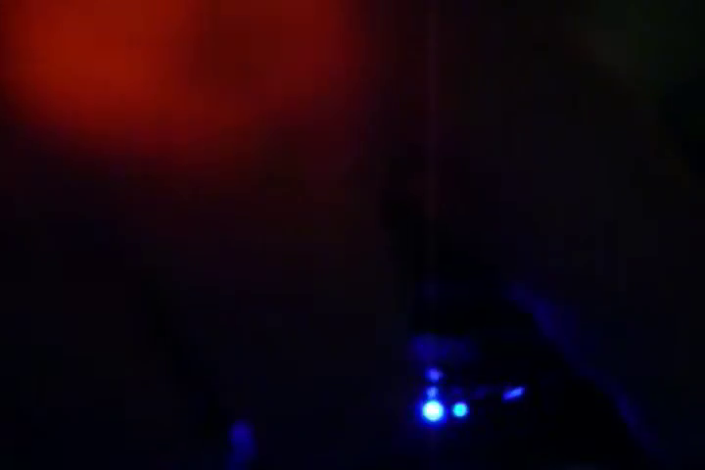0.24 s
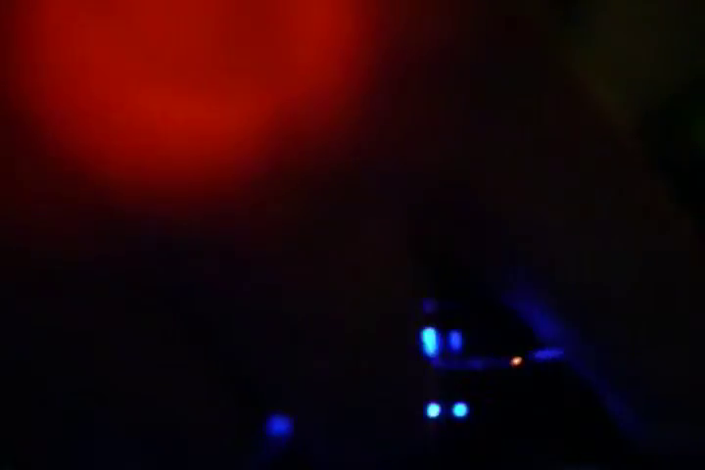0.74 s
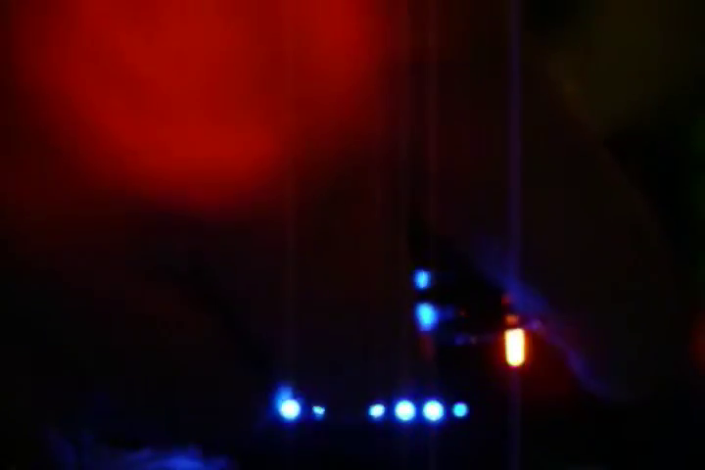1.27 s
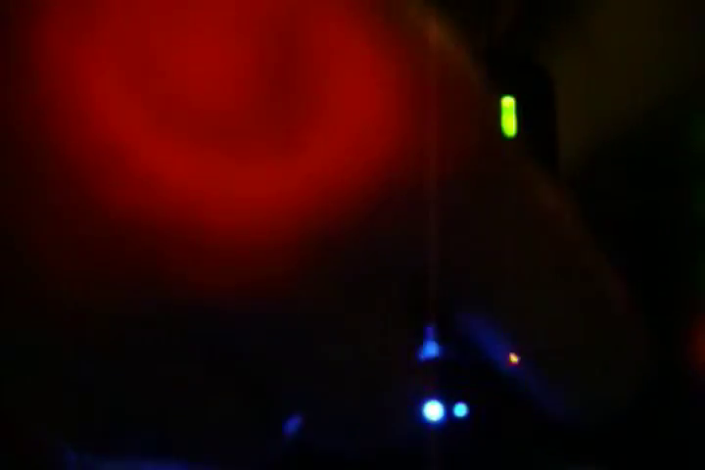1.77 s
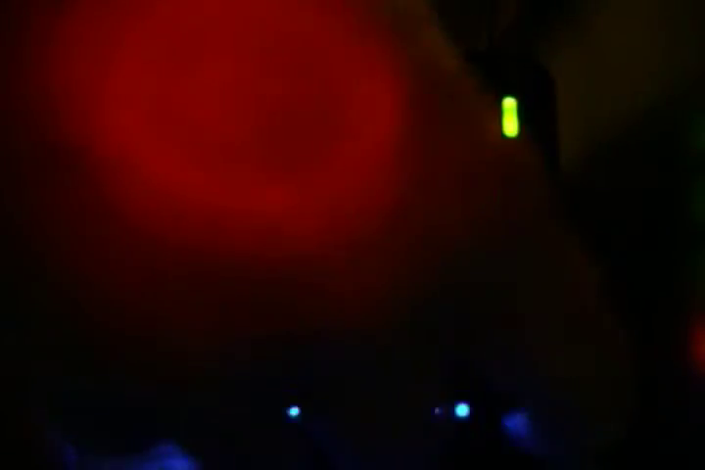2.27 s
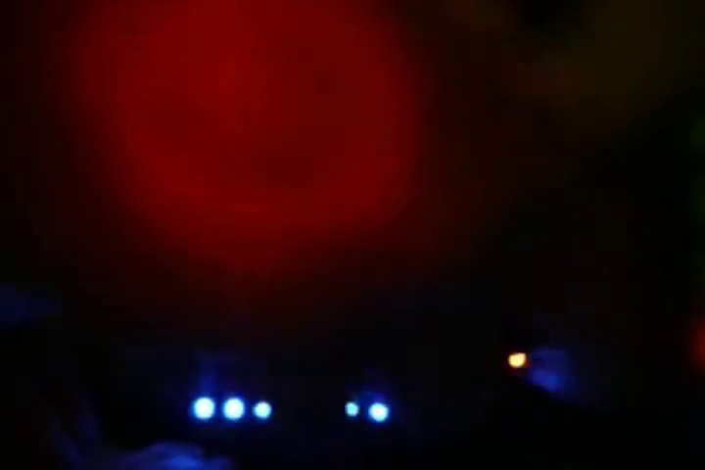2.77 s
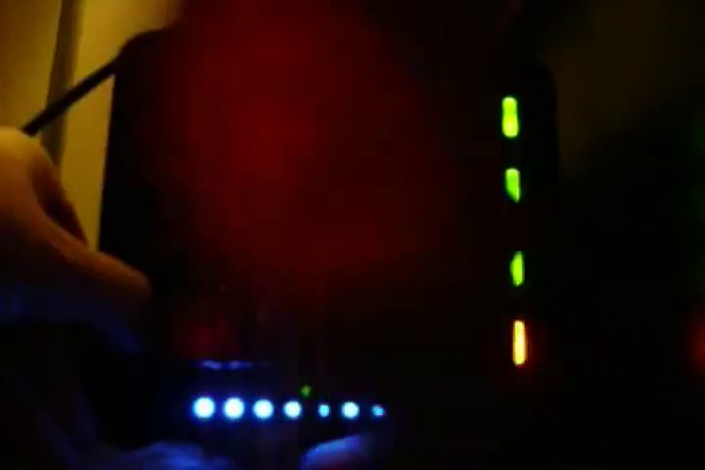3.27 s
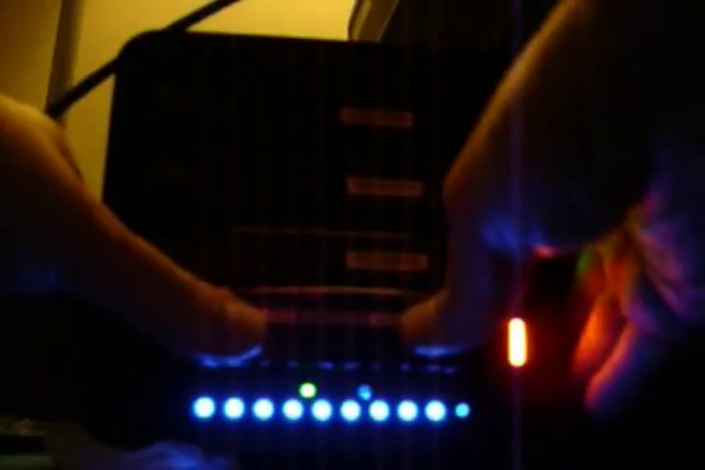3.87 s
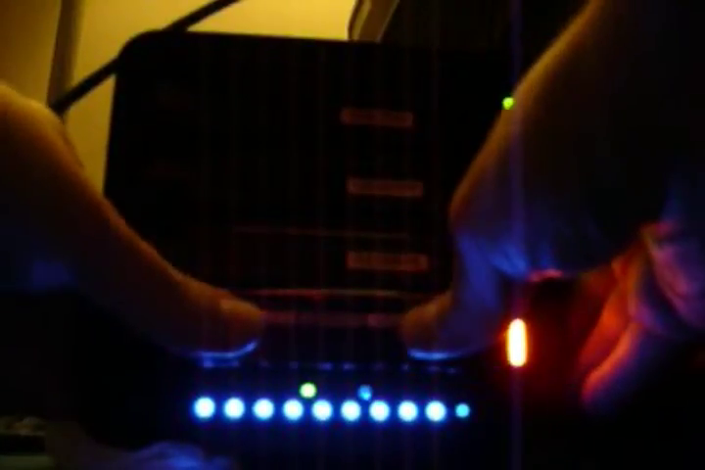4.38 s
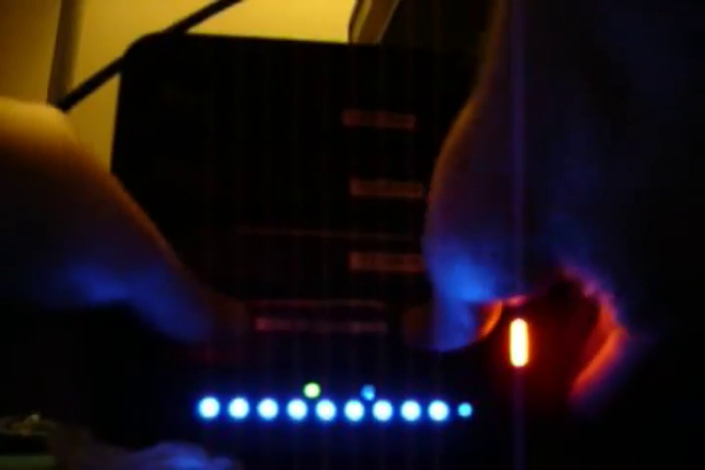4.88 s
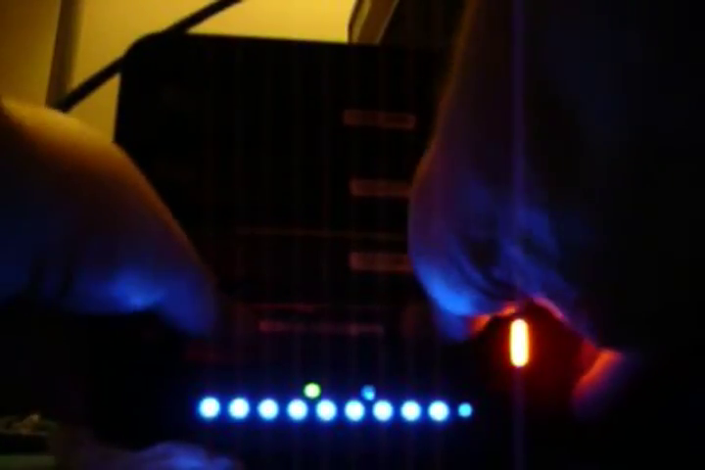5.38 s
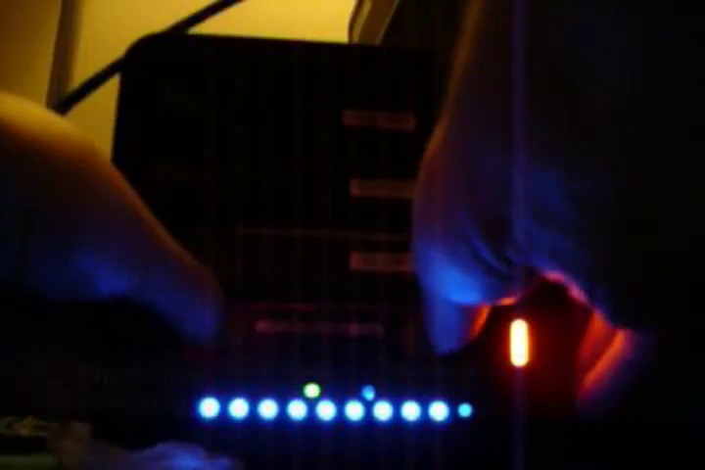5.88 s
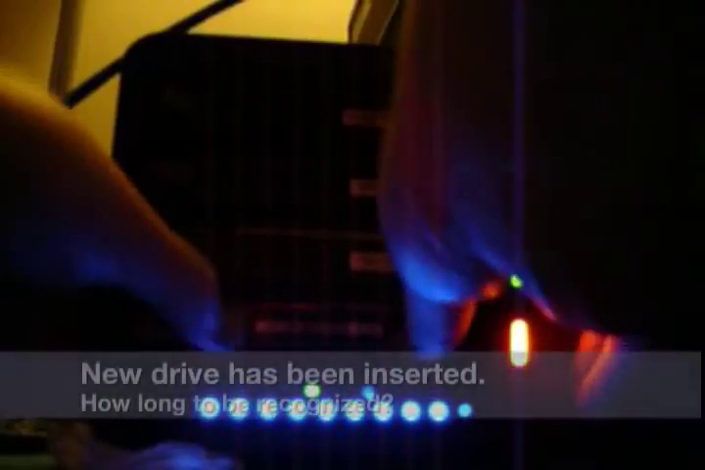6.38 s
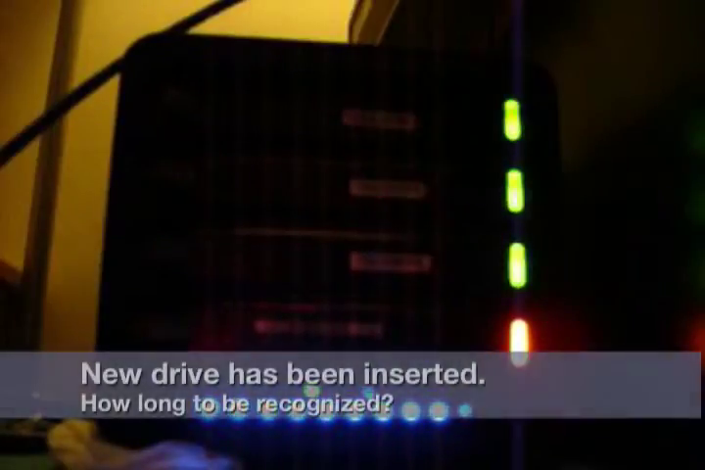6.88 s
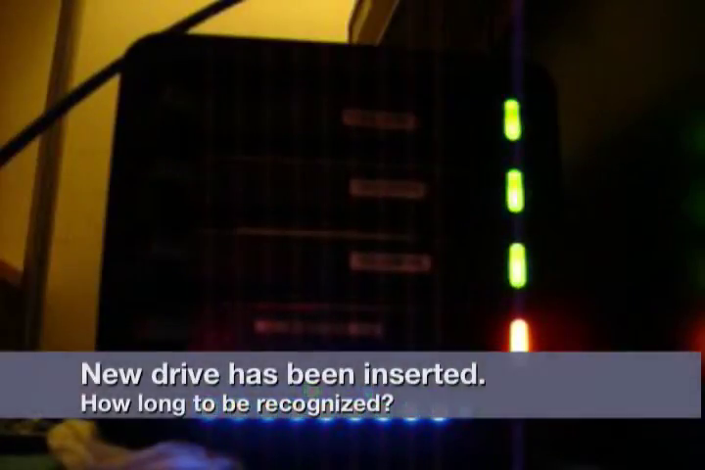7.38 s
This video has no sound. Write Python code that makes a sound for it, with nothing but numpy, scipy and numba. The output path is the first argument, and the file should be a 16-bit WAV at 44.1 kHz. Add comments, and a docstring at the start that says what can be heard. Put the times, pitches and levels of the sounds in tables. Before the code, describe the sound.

A faint hiss with a thin high whine runs throughout, heard close to a small storage unit. From about 0.6 seconds, the hum of fan and drives cuts in and out with soft pops. A hard drive's plastic tray taps the opening at 0.6 seconds, knocks harder around 1.6, and scrapes with a brief judder near 1.9. From 2.7 to 3.3 seconds it rasps along the rails with a cluster of knocks and low handling rumble. A dull thud at 3.4 leaves a side panel ringing softly. Another knock comes at 4 seconds, and the tray seats with a sharp clack at 4.5. The latch snaps shut with a bright, dry click at 5 seconds, followed by light ticks and rubbing. The hum drops away around 5.7 seconds and returns very faintly from about 6.9 to the end.

```python
"""A hard drive in a plastic tray is fed into the bay of a small storage unit, heard close up.
Over a faint hiss and whine, the hum of fan and drives starts cutting in and out with soft pops.
The tray knocks against the opening, scrapes along the rails and judders in the tight spots.
A dull thud leaves a side panel singing; the tray seats with a clack at 4.5 s, and the latch snaps
shut half a second later. The hum drops away, then returns faintly near the end."""
import sys
import numpy as np
from scipy import signal
from scipy.fft import rfft, irfft, next_fast_len
from scipy.io import wavfile
from scipy.ndimage import uniform_filter1d
from numba import njit

SR = 44100
rng = np.random.default_rng(int(sys.argv[2]) if len(sys.argv) > 2 else 0)


def wav_out(sig):
    """Save sig, one row per channel (or a flat mono array), as 16-bit PCM at SR to the path in sys.argv[1]."""
    wavfile.write(sys.argv[1], SR, np.round(np.clip(np.atleast_2d(sig).T, -1, 1) * 32767).astype(np.int16))


N = 337001
T = np.arange(N) / SR


def undb(db):
    """Decibels to gain."""
    return 10 ** (np.asarray(db) / 20)


def unit(x):
    """Scale to rms 1."""
    return x / np.sqrt(np.mean(x ** 2))


def band(x, lo_hz, hi_hz, order=3):
    """Causal band-pass."""
    return signal.sosfilt(signal.butter(order, [lo_hz, hi_hz], "band", fs=SR, output="sos"), x)


def add(out, start, sound):
    """Mix a sound in at a time."""
    i = int(start * SR)
    out[i:i + len(sound)] += sound[:N - i]


def wander(rate_hz):
    """Smooth random modulation with a spread near 1."""
    points = rng.standard_normal(int(N / SR * rate_hz) + 2)
    return 1.2 * np.interp(T * rate_hz, np.arange(len(points)), points)


def swell(peak_s, hold_s, rise_db_per_s, fall_db_per_s):
    """Envelope that builds to its peak, holds, and dies away."""
    before, after = np.maximum(peak_s - T, 0), np.maximum(T - peak_s - hold_s, 0)
    return undb(-rise_db_per_s * before - fall_db_per_s * after)


def coloured(spectrum):
    """Noise through an EQ curve of (frequency [Hz], level [dB]) points, scaled to rms 1."""
    hz, db = np.transpose(spectrum)
    size = next_fast_len(N)
    bins_hz = np.maximum(np.arange(size // 2 + 1) * SR / size, 1)
    curve = undb(np.interp(np.log(bins_hz), np.log(hz), db))
    return unit(irfft(rfft(rng.standard_normal(size)) * curve, size)[:N])


def tones(partials, waver_db, drift_hz):
    """Held sines that waver a little in level and pitch."""
    out = 0
    for hz, db in partials:
        gain = np.sqrt(2) * undb(db + waver_db * wander(9))
        out += gain * np.sin(2 * np.pi * np.cumsum(hz + drift_hz * wander(12)) / SR)
    return out


# EQ curve of the hiss bed (frequency [Hz], relative level [dB])
HISS_EQ = [(25, 1.5), (70, -17.5), (120, -14.5), (200, -17), (600, -18), (820, -17), (1200, -19.5),
           (1800, -17.5), (1920, -10.5), (2060, -20), (8400, -18.5), (10500, -24)]
# thin tones of the whine (frequency [Hz], level [dB])
WHINE_TONES = [(119.5, -76), (840, -86), (1916, -86.5), (2719, -76.5), (2869, -81), (5437, -79),
               (5588, -82.5), (7208, -84), (7424, -81.5), (8306, -81)]
def hiss(hiss_db=-64):
    """The bed: a faint even hiss with a thin whine."""
    return undb(hiss_db) * coloured(HISS_EQ) + tones(WHINE_TONES, waver_db=2.0, drift_hz=1.7)


# EQ curve of the fan's air (frequency [Hz], relative level [dB])
FAN_EQ = [(25, 7.5), (80, -8), (150, -11), (210, -11), (420, -9), (500, -11.5), (630, -14.5), (840, -10.5),
          (1400, -19.5), (2500, -21.5), (4000, -24), (7400, -24), (10500, -26.5)]
# spindle and motor tones (frequency [Hz], level before the gate [dB])
MOTOR_TONES = [(119.5, -52.5), (242, -67.5), (495, -62.5), (743, -67.5), (845, -59), (1210, -72.5),
               (7210, -64.5), (7424, -64.5)]
# spells of hum (start [s], fade start [s], gate gain [dB], pop level [dB])
HUM_CUES = [(0.593, 0.834, 2.5, -35), (0.938, 1.078, 1.5, -23), (1.157, 1.319, 1.5, -23.5),
            (1.514, 2.109, 3, -26.5), (2.218, 2.351, -0.5, -23), (2.696, 3.716, 2.5, -55),
            (3.842, 4.337, 0.5, -23), (4.465, 5.401, 2.5, -23), (5.4997, 5.643, -0.5, -23.5),
            (6.852, 7.7, -23.5, -71.5)]
def hum(fan_db=-47, pop_rise_s=0.00017, pop_fall_s=0.15, pop_hz=2.7):
    """Fan air, spindle hum and motor whistle cut in with a soft pop and fade away again."""
    pops, t = np.zeros(N), T[:SR]
    pop = (1 - np.exp(-t / pop_rise_s)) * np.exp(-t / pop_fall_s) * np.cos(2 * np.pi * pop_hz * t)
    for start, _, _, pop_db in HUM_CUES:
        add(pops, start, undb(pop_db) * pop)
    air = undb(fan_db + 0.82 * wander(12)) * coloured(FAN_EQ)
    return hum_gate() * (air + tones(MOTOR_TONES, waver_db=0.3, drift_hz=2.5)) + pops


def hum_gate(fade_db_per_s=160):
    """Gain that opens at once with each spell of hum and fades at its end."""
    spells = [(T >= start) * undb(db - fade_db_per_s * np.maximum(T - end, 0))
              for start, end, db, _ in HUM_CUES]
    return np.max(spells, axis=0)


# resonances of the unit with the tray in it (frequency [Hz], relative level [dB], t60 [s])
BAY_MODES = [(42, -16, 0.17), (70.9, -15, 0.42), (129.8, -4, 0.084), (175, -7.5, 0.059), (288, -7.5, 0.14),
             (358, -3.5, 0.18), (407.6, 4.5, 0.083), (482.4, 3, 0.1), (579, -5.5, .09), (750, -1.5, 0.072),
             (811, 3.5, 0.077), (874.5, 2.5, 0.078), (953, -2.5, 0.1), (1046, -5, 0.11), (1287, -4, 0.061),
             (1511, 2.5, 0.028), (1728, -7, 0.097), (1970, -6, 0.065), (2305, -13.5, 0.014),
             (2650, -14, 0.02), (3240, -7.5, .035), (3400, -10, 0.023)]
# hits of the tray on the bay; hollowness favours case over tray, hardness lifts rails and edges
# (time [s], strength [dB], hollowness [dB], hardness [dB], chatter decay [s])
TRAY_HITS = [(0.598, -34.5, -3, -3.5, .004), (1.518, -32, 5.5, 4, .0045), (1.651, -19, 4, -1, .0013),
             (2.017, -44.5, 14, -8, .012), (2.6813, -21.5, -11, 3.5, .00066), (2.924, -28.5, 0, 0, .0026),
             (2.993, -30.5, 11.5, -4, .012), (3.037, -25, -1, -1.5, .0069), (3.05, -25, 2.5, -3, .0014),
             (3.129, -24, -3, -0.5, .007), (3.151, -28.5, -7, 3.5, .001),
             (3.2375, -27.5, -8.5, 3.5, 0.0024), (3.4224, -21, 5, -8.5, 0.00087),
             (4.0347, -23.5, -1, 2, .00087), (4.0478, -23, -2.5, 4, .0065), (4.48, -14, -10.5, 7.5, .003),
             (4.4839, -19, -9, 5, .0015), (4.507, -25.5, -7.5, 3, .012), (4.946, -27.5, 3.5, 2, .0053),
             (4.986, -30.5, -12, -1.5, .003), (5.151, -32, 7, 4, .0037), (5.211, -42, -9, 3.5, .003)]
def knocks(click_db=32, puff_db=44, puff_s=0.00069):
    """The tray bumps the bay; every hit rings the same body."""
    out = np.zeros(N)
    puff = np.hanning(int(puff_s * SR))
    for start, strength, hollow, hardness, chatter_s in TRAY_HITS:
        body = ring(BAY_MODES, crack=(13, 0.054), room=(-4.5, .2), scatter_db=3)
        # direct sound of the contact: a sharp click and a rounder puff of air
        body[0] += undb(click_db)
        body[:len(puff)] += undb(puff_db) * puff / puff.sum()
        blow = signal.fftconvolve(body, contact(chatter_s, chatter_db=-20.5))
        add(out, start, voice(blow, balance(strength, hollow, hardness, chatter_s)))
        add(out, start, spike(strength, hardness, chatter_s))
    return out


def ring(modes, crack, room, scatter_db, detune=0.0094):
    """One tap: modes weighted by where it lands, plus plastic crack and room as (level [dB], t60 [s])."""
    t = T[:SR // 3]
    out = np.zeros(len(t))
    for hz, db, t60 in modes:
        weight, mistune, side = rng.standard_normal(3)
        partial = np.sign(side) * np.sin(2 * np.pi * hz * (1 + detune * mistune) * t)
        out += undb(db + scatter_db * weight - 60 * t / t60) * partial
    for db, t60 in crack, room:
        out += undb(db - 60 * t / t60) * rng.standard_normal(len(t))
    return out


def contact(chatter_s, chatter_db):
    """One sharp push, then a dying spray of tiny rebounds."""
    t = T[:SR // 20]
    force = undb(chatter_db) * rng.standard_normal(len(t)) * np.exp(-t / chatter_s)
    force[0] += 1
    return force


def balance(strength, hollow, hardness, contact_s):
    """A hit's five register levels in dB: soft contacts wake the case, hard ones rails and edges."""
    desk = -20.5 + 0.43 * strength  # the desk gives way only a little
    case, tray = strength + hollow / 2, strength - hollow / 2
    rails = strength - 8 + hardness
    scuff = 0.9 * np.log2(contact_s / 0.0019)  # longer contacts scuff more
    edges = strength - 17 + 2.24 * hardness + scuff
    return [desk, case, tray, rails, edges]


# registers of desk, case, tray, rails and sharp edges (low cut [Hz], high cut [Hz])
REGISTERS = [(30, 190), (240, 590), (670, 1180), (1400, 3500), (4400, 11000)]
def voice(response, levels_db):
    """Multiband balance: set the loudest 10 ms of each register to its level."""
    out = 0
    for (lo, hi), db in zip(REGISTERS, levels_db):
        part = band(response, lo, hi, order=4)
        out += part * undb(db) / np.sqrt(uniform_filter1d(part ** 2, size=SR // 100).max())
    return out


def spike(strength, hardness, chatter_s, boost_db=20, clean_s=.0016, width_s=.00015, narrowing=0.55):
    """The attack of a clean hit: one bare pressure spike, narrower the harder the contact."""
    u = T[:SR // 300] / (width_s * undb(-narrowing * hardness))
    cleanness = np.exp(-chatter_s / clean_s)
    return undb(strength + boost_db) * cleanness * u * (2 - u) * np.exp(-u)


# pushes along the rails (time [s], hold [s], relative drag [dB], relative grit [dB])
PUSHES = [(0.764, 0.04, -35, -60), (1.637, 0.034, -38.5, -48.5), (1.708, 0.023, -32.5, -54),
          (1.859, 0.048, -26, -38.5), (1.94, 0.044, -49, -60), (2.74, .185, -39.5, -49.5),
          (2.927, 0.067, -33, -40), (3.048, 0.23, -31, -44), (3.298, 0.09, -43.5, -58.5),
          (3.56, 0.13, -55, -59), (4.071, 0.016, -34, -47.5), (4.194, .13, -49.5, -56.5),
          (4.525, 0.012, -30, -52.5), (4.645, 0.18, -47.5, -67), (4.876, .06, -42, -55),
          (4.96, .1, -37, -50), (5.165, .235, -47.5, -57)]
# the hands shift grip and jolt the case (peak time [s], relative level [dB])
GRIP_JOLTS = [(0.622, -32), (1.925, -33.5), (1.97, -44), (2.07, -40), (2.785, -33.5), (2.915, -24.5),
              (3.0, -30), (3.08, -23), (3.2, -31), (3.64, -41), (4.07, -28.5), (4.49, -24.5), (4.72, -38.5),
              (4.87, -39), (4.965, -29.5), (5.06, -38.5)]
def effort():
    """Envelopes for the slide: pushes drive drag, grit and hand rumble; jolts lift the rumble."""
    drag, grit = np.zeros(N), np.zeros(N)
    for time, hold_s, drag_db, grit_db in PUSHES:
        push = swell(time, hold_s, rise_db_per_s=424.5, fall_db_per_s=272.5)
        drag = np.maximum(drag, undb(drag_db) * push)
        grit = np.maximum(grit, undb(grit_db) * push)
    hands = undb(-20) * drag ** 0.6  # rumble grows more slowly than drag
    for time, db in GRIP_JOLTS:
        hands = np.maximum(hands, undb(db) * swell(time, 0, rise_db_per_s=603, fall_db_per_s=192.5))
    return drag, grit, hands


def sliding(slips_per_s=1100, spread_db=4, uneven_db=3, flicker_db=2,
            groan_db=-1, edge_db=-2, rumble_db=-2):
    """Stick-slip on the rails groans in the body and rasps at the contact; hands rumble the case."""
    drag, grit, hands = effort()
    body, all_slips = 0, 0
    for _ in range(8):  # the load shifts between contact spots, each with its own colour
        sizes = undb(spread_db * np.minimum(rng.exponential(size=N), 4)) * rng.choice([-1, 1], N)
        slips = (rng.random(N) < slips_per_s / SR) * sizes * undb(uneven_db * wander(50))
        spot = ring(BAY_MODES, crack=(15.5, .015), room=(-12, 0.17), scatter_db=1.5)
        body += signal.oaconvolve(slips, spot)[:N]
        all_slips += slips
    tick = ring(BAY_MODES, crack=(27.5, 0.0017), room=(-6.5, .05), scatter_db=2)
    scrape = body + signal.oaconvolve(all_slips, tick)[:N]
    groan = undb(groan_db) * unit(band(body, 300, 1102, order=2))
    rasp = unit(band(scrape, 1400, 3900)) + undb(edge_db) * unit(band(scrape, 4400, 7600, order=1))
    rumble = coloured([(20, -9), (70, -6.5), (165, -4.0), (260, -13), (500, -38.5), (2000, -80)])
    flicker = undb(flicker_db * wander(160))
    return drag * groan + grit * flicker * rasp + undb(rumble_db) * hands * rumble


# tight spots on the rails (time [s], strength [dB], hollowness [dB], hardness [dB], length [s])
TIGHT_SPOTS = [(1.873, -26.5, -10, 0, 0.0205), (2.687, -27.5, 9.5, 5.5, .015), (3.237, -27, -6, 1, 0.017)]
def judders():
    """The tray catches, and a short run of hard slips shakes the bay."""
    out = np.zeros(N)
    for start, strength, hollow, hardness, length_s in TIGHT_SPOTS:
        count = int(length_s * SR) + 2
        slips = rng.standard_normal(count) ** 3 * signal.windows.tukey(count, .2)  # cubed: spiky
        body = ring(BAY_MODES, crack=(15, 0.024), room=(0.5, 0.053), scatter_db=1)
        judder = signal.fftconvolve(body, slips)
        add(out, start, voice(judder, balance(strength, hollow, hardness, length_s)))
    return out


def panel(time_s=3.43, pitch_hz=285.3, note_db=-42):
    """A thin side panel sings on after a dull thud, dipping with the hum."""
    note = tones([(pitch_hz, note_db)], waver_db=0, drift_hz=1.2)
    return hum_gate() * swell(time_s, 0, rise_db_per_s=900, fall_db_per_s=23.5) * note


# resonances of the spring catch (frequency [Hz], relative level [dB], t60 [s])
CATCH_MODES = [(400, -4.5, .13), (830, -2.5, 0.058), (1695, -10, 0.044), (2000, 4.5, 0.023),
               (2670, 1.5, 0.017), (3060, 2.5, 0.033), (3050, -2.5, 0.031), (3300, -9.5, 0.056),
               (4570, 4, .018), (6020, 1, .018), (6030, -7, 0.016), (7070, 8.5, 0.021)]
# balance of its click before the boost (desk [dB], case [dB], tray [dB], rails [dB], edges [dB])
CATCH_BALANCE = [-40, -32, -29.5, -15, -15.5]
def latch(time_s=5.016, boost_db=3):
    """The springy catch snaps home with a bright, dry click."""
    out = np.zeros(N)
    spring = ring(CATCH_MODES, crack=(13, 0.024), room=(-11.5, .14), scatter_db=0)
    snap = signal.fftconvolve(spring, contact(chatter_s=0.0022, chatter_db=-32))
    add(out, time_s, undb(boost_db) * voice(snap, CATCH_BALANCE))
    return out


def scene():
    """All layers in one close mono mix."""
    tray = knocks() + judders() + latch() + sliding()
    return (tray + panel() + hum() + hiss())[None]


@njit
def follow(x, attack, release):
    """Envelope that rises fast and sinks slowly."""
    out, level = np.empty(len(x)), 0.
    for i in range(len(x)):
        level += (abs(x[i]) - level) * (attack if abs(x[i]) > level else release)
        out[i] = level
    return out


def record(dry, knee=0.27, attack_s=.002, release_s=0.51, ceiling=.62, rolloff_hz=10000, top_hz=11200):
    """Gain control ducks after the hardest hits, peaks are rounded, the top is cut."""
    envelope = follow(dry[0], 1 / (attack_s * SR), 1 / (release_s * SR))
    ducked = dry * knee / np.maximum(envelope, knee)
    dulled = signal.sosfilt(signal.butter(16, rolloff_hz, fs=SR, output="sos"), ducked)
    rounded = ceiling * np.tanh(dulled / ceiling)
    return signal.sosfilt(signal.ellip(8, .3, 70, top_hz, fs=SR, output="sos"), rounded)


dry = scene()
out = record(dry)
wav_out(out)
```